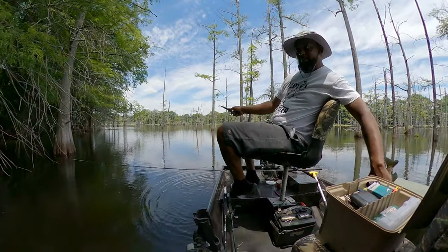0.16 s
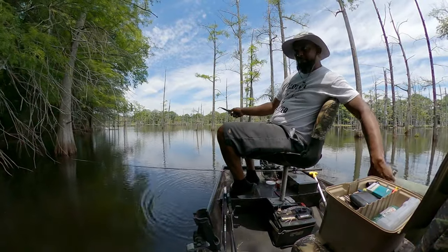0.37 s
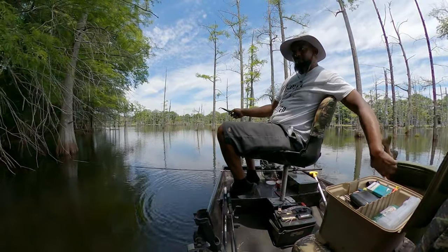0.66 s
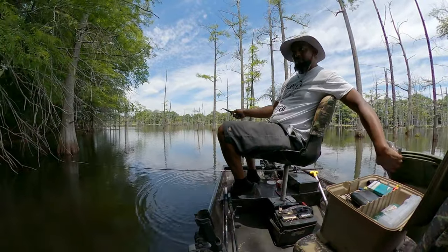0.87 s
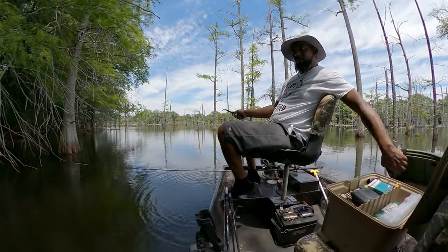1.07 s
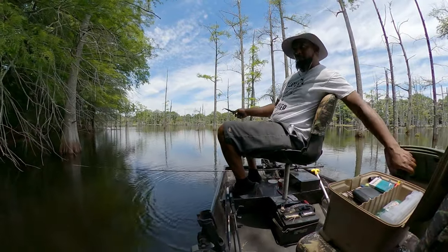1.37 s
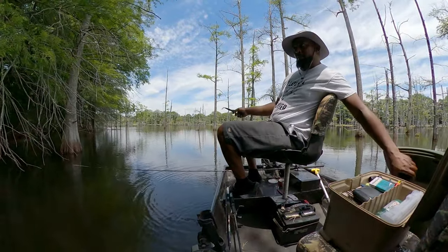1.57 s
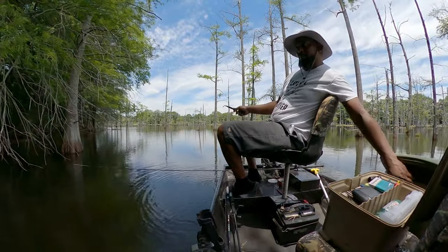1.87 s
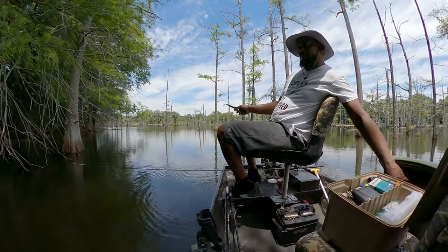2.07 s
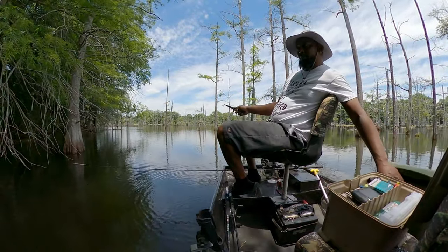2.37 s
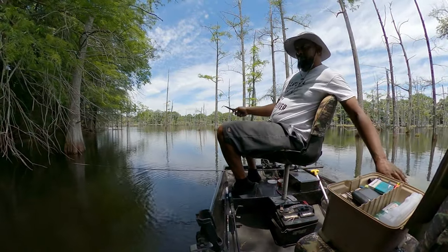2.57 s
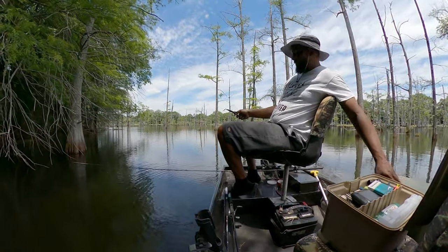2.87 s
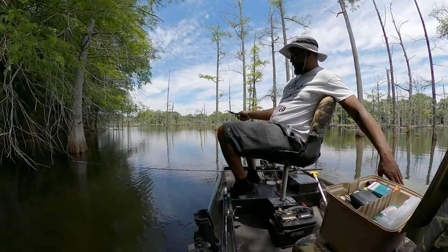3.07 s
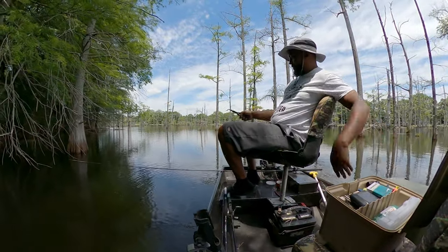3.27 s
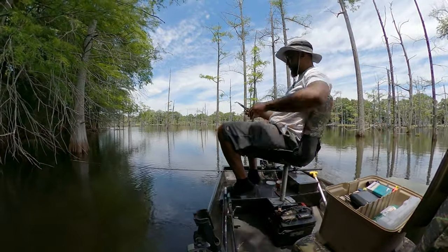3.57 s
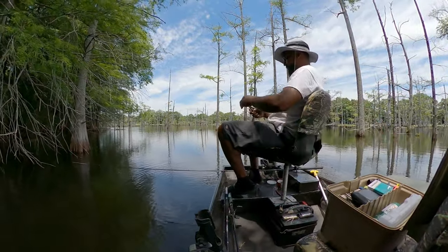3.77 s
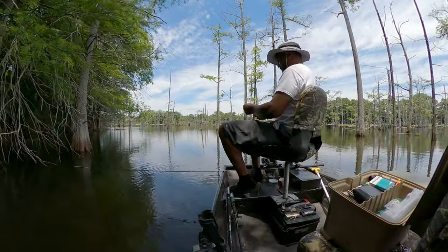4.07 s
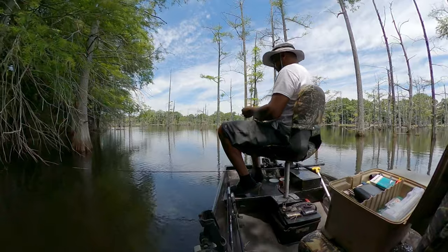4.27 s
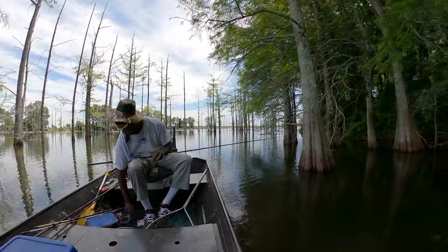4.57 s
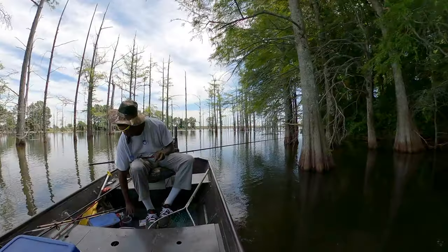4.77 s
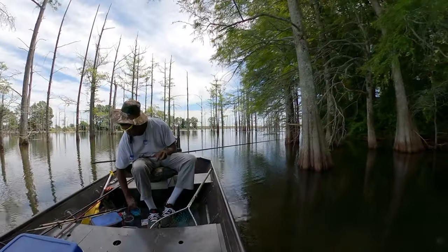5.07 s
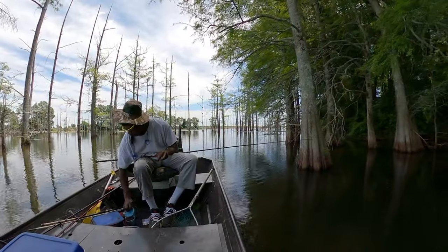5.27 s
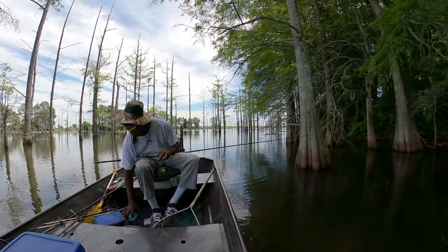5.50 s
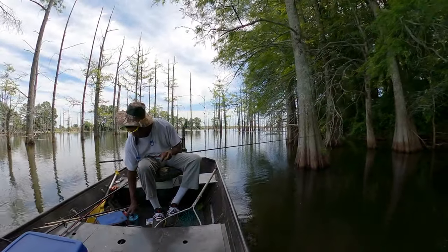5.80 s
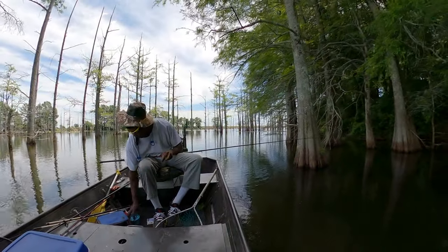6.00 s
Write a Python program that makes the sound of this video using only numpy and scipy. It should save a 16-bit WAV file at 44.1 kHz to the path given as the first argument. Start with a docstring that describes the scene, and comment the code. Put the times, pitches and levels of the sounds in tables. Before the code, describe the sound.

Gear knocks and clicks against a metal boat hull on a lake, a fish briefly splashes, and birds chirp faintly over a light breeze.

```python
"""An angler lets a fish down into a tub in a small aluminium boat on a still lake.
Blows boom in the hull's panels, tackle clicks, thin metal clangs, the fish throws spray and bubbles,
clothes and gear rub. Near 4.5 s the sound dips and changes to a second boat, where gear knocks and
slides on the floor under a steady high hiss. Birds whistling in the trees, breeze, hull rumble
and a faint hum are heard in both boats."""
import sys
import numpy as np
from scipy import signal
from scipy.fft import rfft, irfft, next_fast_len
from scipy.io import wavfile

SR = 44100
rng = np.random.default_rng(int(sys.argv[2]) if len(sys.argv) > 2 else 0)


def materialize(psi):
    """Save the field psi as 16-bit PCM at rate SR to the path in sys.argv[1].

    A 1-D psi becomes a single channel; in a 2-D psi each row is a channel.
    """
    bounded = np.clip(np.atleast_2d(psi).T, -1, 1)
    quanta = np.round(bounded * 32767).astype(np.int16)
    wavfile.write(sys.argv[1], SR, quanta)


N = 270774
TIME = np.arange(N) / SR
AGE = TIME[:SR]  # time since a blow [s]

# soft blows on the hull (time [s], level [dB], panel pitch [Hz], floor boom [dB], slap [dB])
HULL_BLOWS = [(.286, -7.5, 133.5, 2.5, -8.5), (.296, -13.5, 271, 3, -8), (.332, -10.5, 148, -2, -9.5),
              (.385, -19, 190, -2, -3.5), (.661, -24.5, 169, -15, -25), (.778, -12, 172, -5.5, -17),
              (.851, -13, 165.6, -4, -26), (.972, -7.5, 175, -14, -16), (1.042, -17, 164, -13, 1),
              (1.096, -13.5, 169, -2, -3), (1.141, -13, 149.4, -12, -6), (1.788, -18.5, 176, -8, -18),
              (2.088, -3.5, 197.5, -28, -8), (2.210, -14, 211, -20, -6.5), (2.245, -10, 235, -22, 3.5),
              (2.322, -14, 217, -11, -1), (2.442, -4.5, 214, -19, -17), (2.486, -19, 226, -11, -30),
              (2.548, -14, 213, -13, -31), (2.654, -2, 176.5, -2, -6.5), (2.756, -26.5, 170, 8, -25),
              (2.817, -22.5, 168, 9, -14), (2.997, -24.5, 186, -26, -15), (3.370, -24.5, 189, -4, 7.5),
              (3.499, -17.5, 177, -9, -6), (3.545, -24.5, 194, -13, -8), (3.634, -17.5, 178, -28, -12.5),
              (3.818, -23, 177, -27, -9.5)]
# panel modes (ratio to panel pitch, level [dB], t60 [s])
PANEL_MODES = [(0.802, -7.5, 0.3), (1, 1.5, 0.094), (1.239, -6.5, 0.19), (1.52, -8.5, 0.12),
               (2.05, -18, 0.11)]
# floor modes (frequency [Hz], level [dB], t60 [s])
FLOOR_MODES = [(65.2, 1.5, 0.14), (77.2, -1, 0.3), (106.3, -7, 0.46)]
# contact slap (frequency [Hz], level [dB])
SLAP_SPECTRUM = [(100, -35), (280, -2), (550, 4.5), (850, -12), (1300, -6), (2200, -20.5), (5000, -35.5),
                 (8000, -42), (12000, -69)]
def hull():
    """Each soft blow swells into the panel modes, slaps, and booms in the floor by its own amount."""
    ring_hz, ring_db = 181.5, -22  # the hull's longest note
    out = np.zeros(N)
    for s, db, hz, floor_db, slap_db in HULL_BLOWS:
        rise_s = 0.013 * (181 / hz) ** 3.2  # a softer blow pushes longer and sounds lower
        panel = sum(undb(g) * tone(hz * ratio) * swell(rise_s, t60, hold_s=0.0076)
                    for ratio, g, t60 in PANEL_MODES)
        floor = sum(undb(g) * np.sin(2 * np.pi * f * AGE) * swell(rise_s / 2, t60)
                    for f, g, t60 in FLOOR_MODES)
        ring = undb(ring_db) * tone(ring_hz) * swell(2 * rise_s, t60=1)
        slap = noise(SLAP_SPECTRUM, size=SR) * swell(rise_s / 2, t60=0.12)
        blow = undb(-1) * panel + ring + undb(floor_db) * floor + undb(slap_db) * slap
        add(out, s, undb(db) * blow)
    return out


# small tackle (time [s], level [dB], resonance [Hz], chatter t60 [s], bright tick [dB])
TACKLE_CLICKS = [(.042, -25.5, 5400, 0.031, -22), (.060, -28.5, 1720, 0.05, 3),
                 (0.105, -25.5, 6340, 0.017, -5), (.194, -24, 5230, .046, -25),
                 (.203, -19.5, 2650, .02, -18), (.296, -30, 6300, 0.02, 2), (.560, -21.5, 2130, 0.013, -19),
                 (.895, -29, 6730, 0.056, 0), (0.938, -29, 1400, 0.056, -8), (.961, -28, 5960, .023, -14),
                 (.974, -25.5, 530, 0.099, -27), (1.052, -22.5, 1750, 0.064, 1.5),
                 (1.068, -5.5, 1630, 0.025, -9), (1.1, -24.5, 1370, 0.092, 3.5),
                 (1.112, -19.5, 1350, 0.071, -4), (1.478, -32.5, 6750, .022, -24),
                 (1.575, -10, 1520, 0.026, -30), (1.6092, -9.5, 5150, 0.072, -26),
                 (1.853, -30.5, 5800, .05, -2), (1.881, -30.5, 5500, 0.048, -23),
                 (1.929, -32, 5600, .03, -15), (1.957, -20.5, 1500, 0.048, -10.5),
                 (2.034, -22.5, 1720, 0.043, -14), (2.090, -11, 1120, 0.03, -16),
                 (2.261, -0.5, 890, 0.035, -17), (2.289, -6, 1440, 0.063, -25), (2.430, -19, 2500, .04, 2),
                 (2.486, -17, 1430, 0.024, -14), (2.557, -17, 2000, .03, -7),
                 (2.654, -3.5, 1190, 0.037, -3), (2.789, -28.5, 1730, 0.039, -9),
                 (2.848, -32, 1700, .034, -24), (3.192, -23, 1330, .07, -5),
                 (3.227, -31.5, 1280, 0.21, -2.5), (3.35, -31.5, 1590, .028, 4),
                 (3.373, -31, 1310, .098, -8), (3.421, -11.5, 1350, .043, -9),
                 (3.549, -26.5, 2500, 0.029, -12), (3.796, -21, 1450, 0.032, -26),
                 (4.01, -32, 1300, .051, -21), (4.132, -29.5, 6800, 0.029, .5),
                 (4.161, -17.5, 1350, 0.024, -3.5)]
def tackle():
    """A sharp push and brief chatter in one damped resonance; the boat's sides answer faintly."""
    tick_hz_db = [(1000, 11.5), (4000, -3), (7200, 8.5), (9000, -17.5), (12000, -22), (15000, -41)]
    out = np.zeros(N)
    for s, db, hz, t60, tick_db in TACKLE_CLICKS:
        width_hz = 1110 * (hz / 1000) ** 0.46
        body = unit(resonate(resonate(rng.standard_normal(SR), hz, width_hz), hz, width_hz))
        tick = noise(tick_hz_db, size=SR) * decay(1.44 * t60)
        push, sides = undb(-6.5) * decay(0.011), undb(-16) * decay(0.1)
        add(out, s, undb(db) * (body * (decay(t60) + push + sides) + undb(tick_db) * tick))
    return soften(soften(out, 8200), 9200)


# blows on thin metal (time [s], level [dB])
METAL_BLOWS = [(1.072, -29), (1.111, -36.5), (1.141, -7.5)]
# clear modes (frequency [Hz], level [dB])
METAL_MODES = [(1082, -39), (2099, -45), (2164, -42), (2363, -44), (2600, -48), (2842, -48), (2982, -48),
               (3537, -50), (3688, -46), (4140, -47), (5050, -46), (5276, -49), (5550, -51), (6864, -51)]
# dense modes (frequency [Hz], level [dB])
WASH_SPECTRUM = [(180, -29), (300, 2), (841, -13), (1080, -5), (1470, -0.5), (1650, -14), (2170, -2.5),
                 (3220, -11), (5180, -11.5), (7060, -21), (15000, -72)]
# impact crack (frequency [Hz], level [dB])
CRACK_SPECTRUM = [(300, -12.5), (1100, 4), (2500, -5), (5000, -4), (8000, -19), (15000, -47)]
# lingering high modes (frequency [Hz], level [dB])
SHIMMER_SPECTRUM = [(1500, -24), (2600, -3), (4300, -4), (5300, 1.5), (7000, -12), (9000, -24),
                    (14000, -52)]
def clang():
    """Thin metal cracks, then rings: clear modes over a wash of close ones; high ones shimmer on."""
    weights = undb([g for _, g in METAL_MODES])
    weights /= np.linalg.norm(weights)
    out = np.zeros(N)
    for s, db in METAL_BLOWS:
        ring = sum(w * tone(hz) for w, (hz, _) in zip(weights, METAL_MODES))
        ring *= undb(6) * decay(0.078) + undb(-11.5) * decay(0.48)
        wash = undb(-3.5) * noise(WASH_SPECTRUM, size=SR) * decay(0.42)
        crack = undb(22.5) * noise(CRACK_SPECTRUM, size=SR) * decay(0.025)
        shimmer = undb(-17) * noise(SHIMMER_SPECTRUM, size=SR) * swell(0.01, t60=0.84)
        add(out, s, undb(db) * (crack + ring + wash + shimmer))
    return out


# strokes of the fish (time [s], level [dB], rise [s], t60 [s])
FISH_STROKES = [(2.210, -11.5, 0.029, 0.27), (2.245, -27, 0.0054, 0.056), (2.307, -17.5, .009, 0.29),
                (2.331, -21, 0.0058, 0.043), (2.371, -20, 0.029, 0.43), (2.429, -13, 0.0028, 0.081),
                (2.484, -29, 0.0045, 0.6), (2.556, -24, 0.0041, 0.27), (2.605, -31.5, 0.038, 0.084)]
# spray (frequency [Hz], level [dB])
SPRAY_SPECTRUM = [(150, -13), (300, 2), (600, -4.5), (900, -17), (1250, -10), (1900, -6.5), (2500, -7),
                  (3600, -9.5), (5500, -9), (7300, -13.5), (8500, -23.5), (11000, -34), (15000, -71)]
# tub wall modes (frequency [Hz], width [Hz], level [dB])
TUB_MODES = [(626, 84, -5), (1133, 67, 7.5), (1820, 140, 9), (3600, 270, -26)]
def splash():
    """Each stroke of the fish throws spray, patters on the tub and leaves bubbles rising in pitch."""
    force, bubbles = np.zeros(N), np.zeros(N)
    for s, db, rise_s, t60 in FISH_STROKES:
        add(force, s, undb(db) * swell(rise_s, t60))
    first_s, last_s = FISH_STROKES[0][0], FISH_STROKES[-1][0] + 0.031
    for when, pitch, strength in rng.random(size=(160, 3)):
        hz = 600 * 9 ** pitch
        bubble = np.sin(2 * np.pi * hz * AGE * (1 + 5 * AGE)) * decay(32 / hz)
        add(bubbles, first_s + when * (last_s - first_s), strength ** 3 * bubble)
    spray = colour(crackle(9000, spread_db=0.98), SPRAY_SPECTRUM) * flicker(160, depth_db=1.5)
    drops = crackle(260, spread_db=2.5)
    patter = unit(sum(undb(g) * resonate(drops, hz, width_hz) for hz, width_hz, g in TUB_MODES))
    return force * (undb(2.5) * spray + undb(4) * bubbles + undb(-5.5) * soften(patter, 9000))


# the angler's movements (start [s], length [s], scrape [dB], swish [dB])
MOVEMENTS = [(-.05, 0.35, -43, -38), (0.234, .26, -42, -40), (0.548, 0.7, -45, -41),
             (1.43, 0.29, -52, -47.5), (1.915, 0.22, -48, -42.5), (2.723, 0.17, -44, -67),
             (3.091, .2, -49.5, -42.5), (3.302, 0.41, -41.5, -37), (3.58, .56, -48.5, -39.5),
             (4.08, .28, -55, -42)]
# low rubbing (frequency [Hz], level [dB])
SCRAPE_SPECTRUM = [(200, -14), (400, -1.5), (800, -8.5), (1300, -1.5), (1800, -6.5), (2400, -17.5),
                   (3200, -28.5), (5000, -39)]
# high rubbing (frequency [Hz], level [dB])
SWISH_SPECTRUM = [(1470, -19), (2500, -3), (3020, -5.5), (3360, -4.5), (4710, -5), (5330, -3.5),
                  (7060, -8.5), (7750, -15), (8700, -19), (14000, -50)]
def rubbing():
    """Cloth and gear rub in fine, uneven grains; a fibre or small part sometimes catches and ticks."""
    rest_scrape_db, rest_swish_db = -52.5, -45
    power = sum(np.outer(undb(dbs), arch(s, length_s, taper=0.47)) ** 2
                for s, length_s, *dbs in MOVEMENTS)
    scrape_gain, swish_gain = np.hypot(np.sqrt(power), undb([[rest_scrape_db], [rest_swish_db]]))
    scrape = colour(crackle(4000, spread_db=1.9), SCRAPE_SPECTRUM) * flicker(35, depth_db=3.4)
    swish = colour(crackle(14000, spread_db=0.93), SWISH_SPECTRUM) * flicker(30, depth_db=0.92)
    catches = resonate(crackle(56, spread_db=2.2), 2200, width_hz=3000)
    catches = unit(soften(catches, 7000))
    return scrape_gain * (undb(4.5) * scrape + undb(-6.5) * catches) + swish_gain * undb(-0.5) * swish


# gear set down (time [s], level [dB], knock t60 [s], cutoff [Hz])
GEAR_KNOCKS = [(4.686, -29.5, 0.14, 2480), (5.042, -39, 0.078, 2500), (5.389, -17.5, 0.07, 6100),
               (5.416, -24, 0.1, 2500), (5.439, -25, 0.11, 4020), (5.467, -26, 0.085, 5000),
               (5.535, -31, 0.24, 2000), (5.562, -34.5, 0.099, 2500), (5.595, -33.5, 0.072, 1800),
               (5.765, -45, 0.087, 2500), (5.857, -31, 0.2, 4000), (5.984, -31, 0.059, 2460),
               (6.038, -30, 0.064, 2000)]
# modes struck by the gear (frequency [Hz], level [dB], t60 [s])
GEAR_MODES = [(235, -1.5, 0.15), (320, 0, 0.14), (524.5, -5, 0.19), (775, -7, 0.18), (1186, -1.5, 0.056),
              (1410, -13, 0.05), (1696, -8, 0.059), (2740, -8, 0.034), (3940, -10, .05)]
# contact knock (frequency [Hz], level [dB])
KNOCK_SPECTRUM = [(150, -13), (450, 10.5), (800, -10), (1400, -4.5), (2500, -7), (6000, -4), (9000, -4),
                  (15000, -51)]
# gear sliding, and one low thump as the boat wobbles
# (time [s], level [dB], rise [s], t60 [s], centre [Hz])
SLIDES_AND_THUMP = [(5.531, -35.5, 0.036, 0.073, 6000), (5.55, -33, 0.015, 0.56, 62.3),
                    (4.685, -33, 0.0014, 0.081, 1370), (5.40, -38, 0.013, 0.48, 603),
                    (5.755, -44.5, 0.012, 0.41, 1270), (5.839, -41.5, 0.019, 0.3, 1510),
                    (5.96, -46.5, 0.013, 0.32, 1250)]
def gear():
    """Gear knocks and slides on the second boat's floor; the boat wobbles with one low thump."""
    out = np.zeros(N)
    for s, db, t60, cutoff_hz in GEAR_KNOCKS:
        spot = rng.standard_normal((len(GEAR_MODES), 2))  # each spot rings a little differently
        ring = sum(undb(g + 2.1 * louder) * tone(hz * (1 + 0.028 * detune)) * decay(mode_t60)
                   for (hz, g, mode_t60), (louder, detune) in zip(GEAR_MODES, spot))
        ring *= decay(3 * t60)  # further damping
        knock = noise(KNOCK_SPECTRUM, size=SR) * decay(t60)
        add(out, s, undb(db) * soften(undb(-10.5) * ring + undb(-5) * knock, cutoff_hz))
    for s, db, rise_s, t60, hz in SLIDES_AND_THUMP:
        grains = crackle(9000, spread_db=1.5)[:SR]
        band = unit(resonate(resonate(grains, hz, width_hz=hz), hz, width_hz=hz))
        add(out, s, undb(db) * swell(rise_s, t60) * band)
    return soften(out, 7400)


# whistles (start [s], length [s], first pitch [Hz], last pitch [Hz], level [dB], echo [dB])
BIRD_NOTES = [(0.021, 0.032, 2690, 3266, -31.5, 2), (0.281, 0.028, 6500, 6310, -32, -3),
              (.315, .03, 5210, 4170, -33, -2), (0.343, .03, 6330, 6480, -44, -4),
              (.345, 0.034, 5130, 5290, -32, -1), (.412, .032, 6000, 4210, -32.5, -1),
              (0.445, 0.036, 4980, 5360, -27, -1.5), (0.516, 0.028, 4430, 3420, -37.5, 3),
              (.548, 0.033, 2920, 3135, -34.5, 2), (0.586, 0.058, 2580, 2750, -31.5, 1),
              (0.816, 0.04, 6060, 5140, -33, -2), (1.86, 0.039, 6160, 5800, -39.5, -3),
              (2.03, 0.073, 6100, 5770, -34.5, -2), (3.584, 0.12, 5540, 3390, -33, -3.5),
              (3.856, 0.12, 5730, 3330, -33, -6.5), (4.16, 0.048, 3750, 4100, -40, -1),
              (4.205, 0.037, 5400, 4690, -42, -1), (4.76, 0.23, 2700, 2250, -62, 1),
              (5.583, 0.18, 2910, 2260, -59, 1)]
def birds():
    """Near-pure whistles glide in pitch; the trunks scatter them into a lingering echo."""
    song, scattered = np.zeros(N), np.zeros(N)
    waver, strength = flicker(500, depth_db=0.13), flicker(90, depth_db=3.1)
    for s, length_s, first_hz, last_hz, db, echo_db in BIRD_NOTES:
        on = (TIME > s) & (TIME < s + length_s)
        along = (TIME[on] - s) / length_s
        glide = np.expm1(-1.6 * along) / np.expm1(-1.6)  # fast at first, then settling
        hz = (first_hz + (last_hz - first_hz) * glide) * waver[on]
        envelope = undb(db) * strength[on] * signal.windows.tukey(len(hz), 0.3)
        note = envelope * np.sin(2 * np.pi * np.cumsum(hz) / SR)
        song[on] += note
        scattered[on] += undb(echo_db) * note
    trees = rng.standard_normal(SR) * swell(0.0076, t60=1)
    return undb(-0.5) * song + signal.fftconvolve(scattered, trees / np.linalg.norm(trees))[:N]


# breeze strength (time [s], level [dB])
BREEZE_LEVELS = [(0, -29.5), (.8, -32), (1.05, -46), (1.7, -45), (2.3, -35.5), (3.6, -27), (4.4, -31.5),
                 (5.15, -45), (6.14, -47)]
# single gusts (start [s], length [s], level [dB])
GUSTS = [(-.1, 0.23, -23.5), (0.762, 0.15, -23.5), (4.212, 0.21, -22), (4.582, 0.23, -21),
         (4.698, 0.27, -29)]
# air buffeting (frequency [Hz], level [dB])
BUFFET_SPECTRUM = [(10, -6), (22, 1), (38, -6.5), (70, -11.5), (120, -34), (300, -42)]
def buffeting():
    """Air buffets the microphone as the breeze blows and as blows make the boat heave."""
    (breeze,) = gains(BREEZE_LEVELS)
    gusts = sum(undb(db) * arch(s, length_s, taper=0.89) for s, length_s, db in GUSTS)
    floor_blows = [(s, db + floor_db) for s, db, _, floor_db, _ in HULL_BLOWS]
    heave = undb(-16) * stirred(floor_blows, rise_s=0.008, t60=0.34)
    return (breeze * flicker(9, depth_db=3.5) + gusts + heave) * noise(BUFFET_SPECTRUM)


# hull rumble (frequency [Hz], level [dB])
RUMBLE_SPECTRUM = [(45, -9.5), (64, -4.5), (90, -13.5), (122, -1.5), (150, -4.5), (184, 1), (225, -9.5),
                   (310, -9), (450, -21), (900, -35.5)]
def rumble():
    """Blows and gear leave the hull rumbling; it dies back to a faint resting level."""
    from_blows = undb(-22.5) * stirred(HULL_BLOWS, rise_s=0.033, t60=1.12)
    from_gear = undb(-18) * stirred(GEAR_KNOCKS, rise_s=0.012, t60=0.36)
    return (from_blows + from_gear + undb(-49)) * noise(RUMBLE_SPECTRUM) * flicker(14, depth_db=2.36)


# high hiss (frequency [Hz], level [dB])
HISS_SPECTRUM = [(2000, -22.5), (3100, -10), (3700, 0.5), (4300, 0.5), (4900, -7), (5700, -9.5),
                 (6500, -11.5), (7500, -8.5), (8400, -16.5), (9300, -27), (12000, -31), (14000, -44)]
# hush of the trees (frequency [Hz], level [dB])
TREES_SPECTRUM = [(180, -18), (300, -4.5), (420, -8), (458, -13.5), (857, -21.5), (1240, -9.5),
                  (3000, -19.5), (3900, -53), (6600, -120)]
def background():
    """A steady high background hiss, strongest near 4 kHz, over the hush of the trees."""
    hiss = undb(-46.5) * noise(HISS_SPECTRUM) * flicker(15, depth_db=0.97)
    hush = undb(-56.5) * noise(TREES_SPECTRUM) * flicker(19, depth_db=0.68)
    return hiss + hush


# hum harmonics (multiple, level [dB])
HUM_HARMONICS = [(1, -47.5), (2, -49.5), (3, -45)]
def hum(hz=61):
    """A faint, wavering low hum, perhaps a small electric motor."""
    phase = 2 * np.pi * np.cumsum(hz * flicker(12, depth_db=0.1192)) / SR
    return sum(undb(db) * np.sin(k * phase) * flicker(10, depth_db=3.2) for k, db in HUM_HARMONICS)


def undb(db):
    """Decibels to gain."""
    return 10 ** (np.asarray(db) / 20)


def unit(x):
    """Scale to rms 1."""
    return x / np.sqrt(np.mean(x ** 2))


def gains(table):
    """The dB columns of a curve as gains at every sample."""
    s, *columns = np.transpose(table)
    return [undb(np.interp(TIME, s, db)) for db in columns]


def add(out, s, sound):
    """Mix a sound in at s seconds."""
    i = max(int(s * SR), 0)
    out[i:i + len(sound)] += sound[:N - i]


def colour(x, spectrum):
    """Filter x by a curve of (Hz, dB) points, at rms 1."""
    hz, db = np.transpose(spectrum)
    size = next_fast_len(len(x))
    bin_hz = np.arange(size // 2 + 1) * SR / size + 1
    response = undb(np.interp(np.log(bin_hz), np.log(hz), db, right=-120))
    return unit(irfft(rfft(x, size) * response, size)[:len(x)])


def noise(spectrum, size=N):
    """Coloured noise at rms 1."""
    return colour(rng.standard_normal(size), spectrum)


def resonate(x, hz, width_hz):
    """Two-pole resonance, gain 1 at its centre."""
    return signal.lfilter(*signal.iirpeak(hz, hz / width_hz, fs=SR), x)


def soften(x, hz):
    """Low-pass: a contact that takes some time leaves little above hz."""
    return signal.sosfilt(signal.butter(2, hz, fs=SR, output="sos"), x)


def decay(t60):
    """Free decay by 60 dB in t60 seconds."""
    return np.exp(-np.log(1000) * AGE / t60)


def swell(rise_s, t60, hold_s=0):
    """Smooth rise to 1, hold, then free decay."""
    attack = np.sin(np.pi / 2 * np.minimum(AGE / rise_s, 1))
    return attack * np.exp(-np.log(1000) * np.maximum(AGE - rise_s - hold_s, 0) / t60)


def arch(start_s, length_s, taper):
    """Smooth rise to 1, hold and fall; taper is the share spent on both slopes."""
    along = (TIME - start_s) / length_s
    return np.sin(np.pi / 2 * np.clip(2 * np.minimum(along, 1 - along) / taper, 0, 1)) ** 2


def stirred(blows, rise_s, t60):
    """Amplitude of a motion fed by blows (time [s], level [dB], ...) and decaying between them."""
    power = np.zeros(N)
    for s, db, *_ in blows:
        add(power, s, (undb(db) * swell(rise_s, t60)) ** 2)
    return np.sqrt(power)


def tone(hz):
    """One mode in random phase, at rms 1."""
    return np.sqrt(2) * np.sin(2 * np.pi * (hz * AGE + rng.random()))


def flicker(per_s, depth_db):
    """A factor wandering at random about 1."""
    steps = rng.standard_normal(int(N / SR * per_s) + 2)
    return undb(depth_db * np.interp(TIME * per_s, np.arange(len(steps)), steps))


def crackle(per_s, spread_db):
    """Random tiny clicks, a few larger than the rest."""
    sizes = undb(spread_db * np.minimum(rng.exponential(size=N), 4))
    return (rng.random(N) < per_s / SR) * sizes * rng.standard_normal(N)


# fade between the boats (time [s], first boat [dB], second boat [dB])
BOAT_FADE = [(4.3, -4, -76.5), (4.40, -13, -78), (4.455, -10.5, -46), (4.48, -48, 2.5), (4.52, -92, 4)]
def scene():
    """The first boat gives way to the second; birds, breeze, rumble and hum are heard in both."""
    first, second = gains(BOAT_FADE)
    mix = first * (hull() + tackle() + clang() + splash() + rubbing())
    mix += second * (gear() + background())
    mix += (first + second) * birds()
    return (mix + buffeting() + rumble() + hum())[None]


def record(dry, cutoff_hz=15800):
    """The hardest blows clip at full scale; a steep low-pass cuts the top."""
    lowpass = signal.ellip(8, 0.2, 80, cutoff_hz, fs=SR, output="sos")
    return signal.sosfilt(lowpass, np.clip(dry, -1, 1))


dry = scene()
out = record(dry)
materialize(out)
```